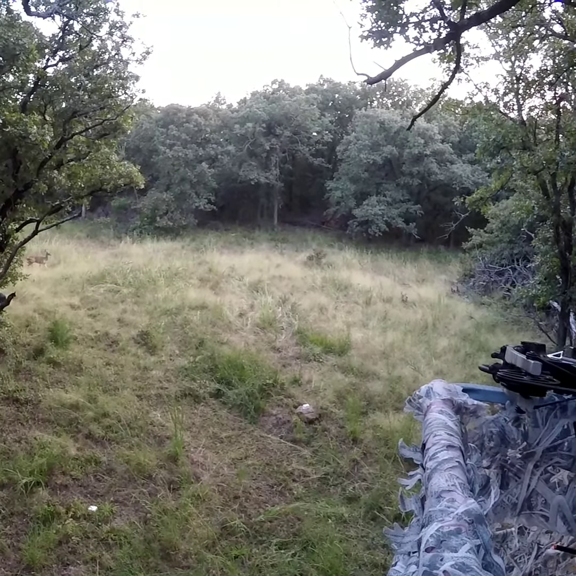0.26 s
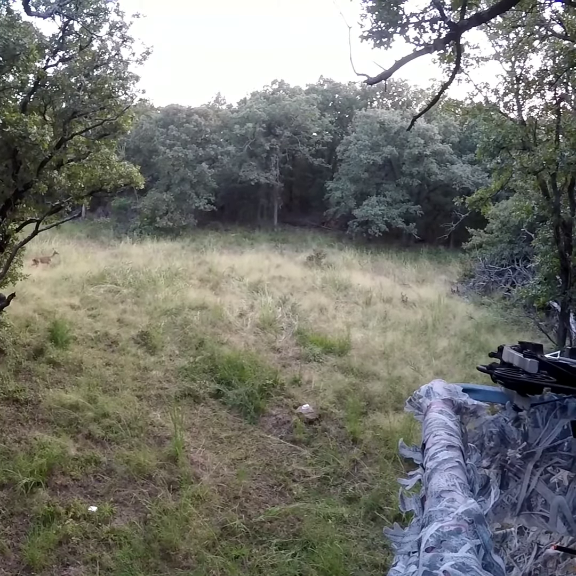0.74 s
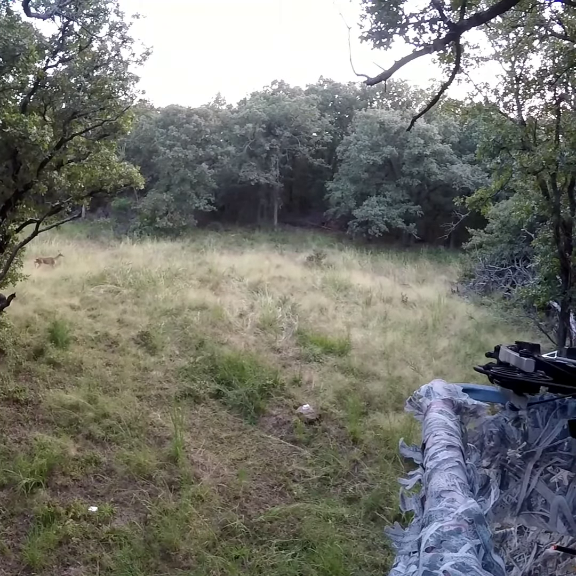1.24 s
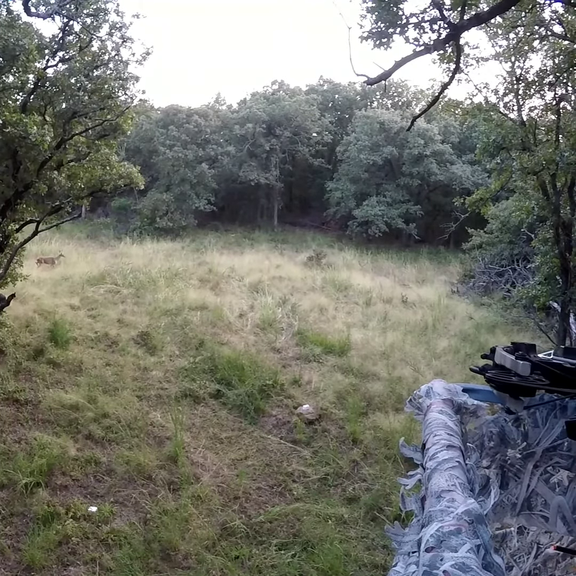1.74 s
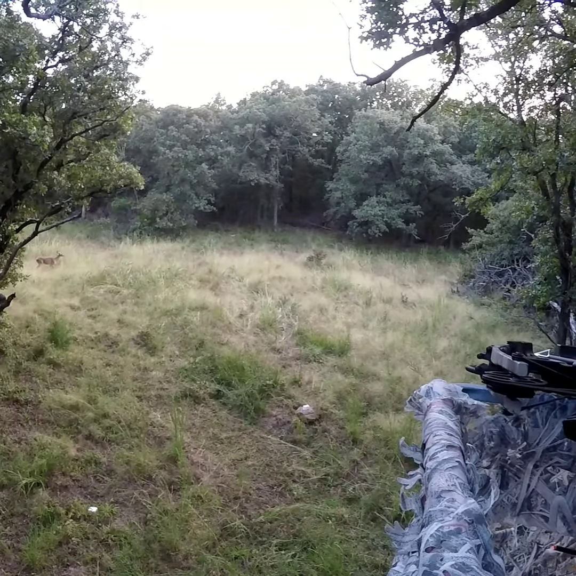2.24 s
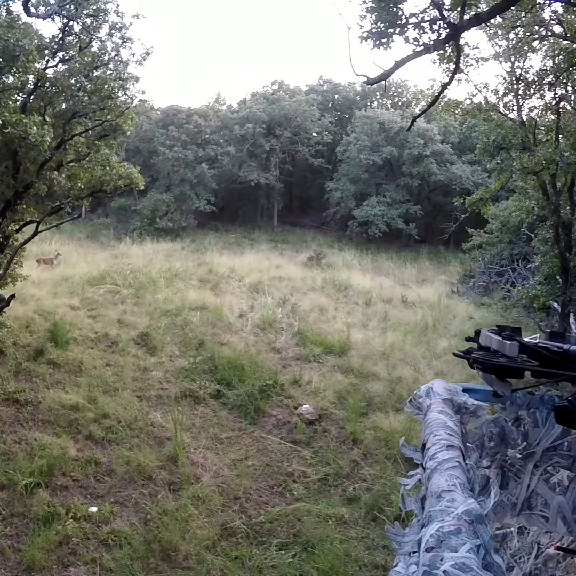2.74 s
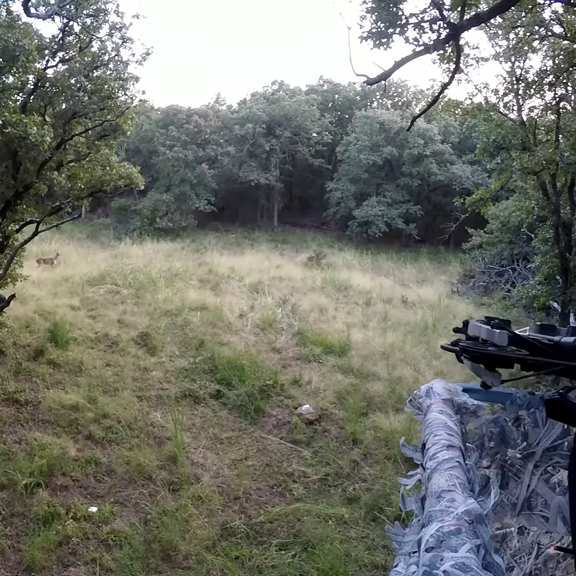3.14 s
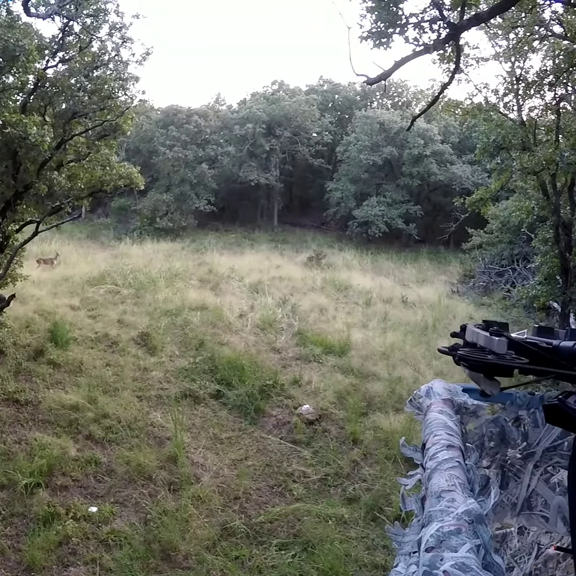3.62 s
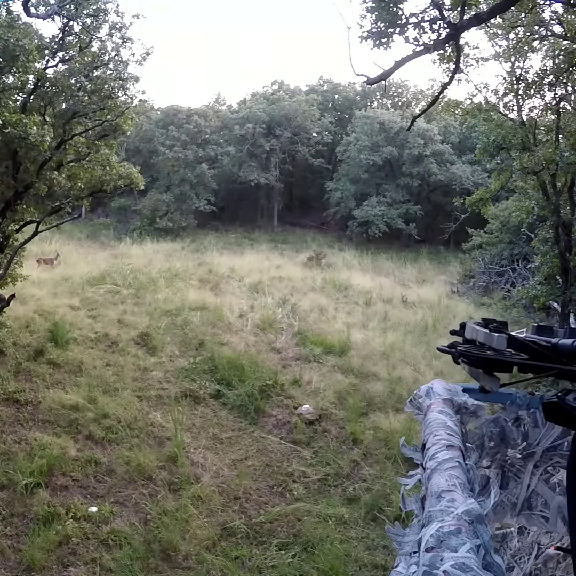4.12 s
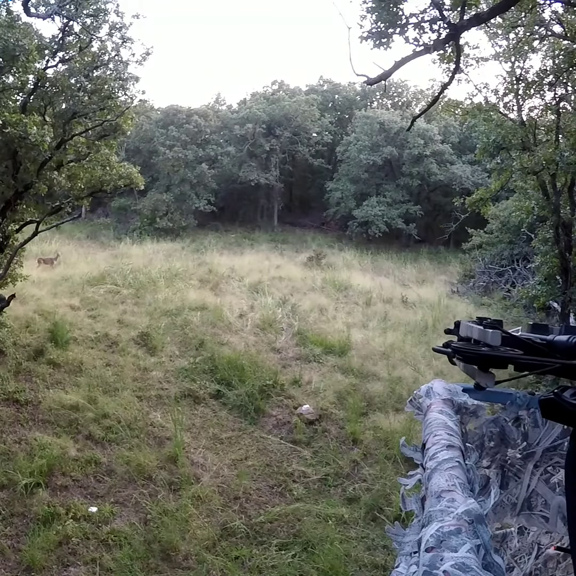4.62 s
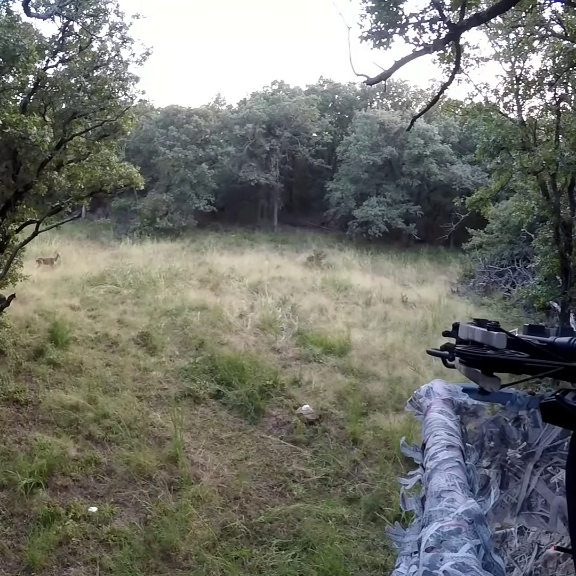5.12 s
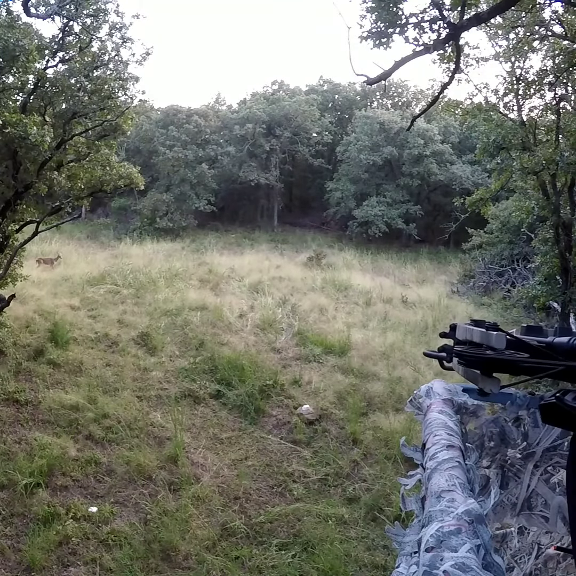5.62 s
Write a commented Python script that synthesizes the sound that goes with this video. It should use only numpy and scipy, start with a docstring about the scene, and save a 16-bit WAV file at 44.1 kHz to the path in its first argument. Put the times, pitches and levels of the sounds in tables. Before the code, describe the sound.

Close, muffled rubbing and low wooden-sounding thumps come through the body of a camera on a stand, uneven for under two seconds, then fading. Behind them, distant crickets give regular two- and three-pulse chirps with slight woodland echo. Very high, dry katydid ticks run through the first two seconds, pause, and return faintly after four. A faint steady air rush and thin hiss fill the open evening meadow.

```python
"""The edge of a meadow in the evening, heard by a camera on a hunting stand. A hand shifts on the stand: stick-slip
friction excites the resonances of frame, mount and shell as a dull rumble with soft knocks, then dies away.
Two crickets chirp in gliding tones with echoes from trunks and wood; a katydid ticks in very high noise bursts.
Shaped noise makes the rush of the air and the fine hiss above it."""
import sys
import numpy as np
from scipy import signal
from scipy.fft import rfft, irfft, next_fast_len
from scipy.io import wavfile
from scipy.ndimage import map_coordinates

SR = 44100
rng = np.random.default_rng(int(sys.argv[2]) if len(sys.argv) > 2 else 0)


def digitize_waveform(pressure):
    """Quantize a signal to 16-bit integers and store it at the path in sys.argv[1].

    Rows of a 2-D input are taken as channels; values are limited to [-1, 1].
    """
    field = np.atleast_2d(pressure).T
    bounded = np.clip(field, -1, 1)
    quanta = np.round(bounded * 32767).astype(np.int16)
    wavfile.write(sys.argv[1], SR, quanta)


N = 258426  # samples


def amp(db):
    """Decibel law: the amplitude gain of a level in dB."""
    return 10 ** (np.asarray(db) / 20)


def along(points, hz):
    """Logarithmic pitch scale: (Hz, value) points joined by straight lines over log frequency."""
    point_hz, value = np.transpose(points)
    return np.interp(np.log(hz + 1), np.log(point_hz + 1), value)


def curves(rows):
    """Linear interpolation: one value per sample for each column after the time."""
    seconds, *columns = np.transpose(rows)
    return [np.interp(np.arange(N) / SR, seconds, column) for column in columns]


def filtered(x, response):
    """Linear filtering: the spectrum of x times a complex response of frequency."""
    size = next_fast_len(x.shape[-1] + 8192)  # padding leaves room for ringing
    spectrum = rfft(x, size) * response(np.fft.rfftfreq(size, 1 / SR))
    return irfft(spectrum, size)[..., :x.shape[-1]]


def band_unit(x, lo_hz, hi_hz):
    """Band level: x scaled to rms 1 inside a band."""
    return x / np.std(filtered(x, lambda hz: (hz > lo_hz) & (hz < hi_hz)))


def modes(table):
    """Modal superposition: the causal response of a few damped resonances, alternating in sign."""
    def response(hz):
        total = 0
        for k, (centre, width, db) in enumerate(table):
            damping = 1j * hz * width
            total = total + (-1) ** k * amp(db) * damping / (centre ** 2 - hz ** 2 + damping)
        return total
    return response


def low_pass(edge_hz):
    """Treble absorption: a smooth roll-off above the edge."""
    return lambda hz: 1 / (1 + (hz / edge_hz) ** 4)


def coloured(spectrum, channels=1):
    """Spectral shaping: white noise given a (Hz, dB) spectrum."""
    return filtered(rng.standard_normal((channels, N)), lambda hz: amp(along(spectrum, hz)))


def wobble(rate):
    """Slow random modulation: a smooth curve through random knots, rate of them a second."""
    knots = rng.standard_normal(int(N * rate / SR) + 4)
    return map_coordinates(knots, [np.arange(N) * rate / SR])


def add(track, s, sound):
    """Superposition: mix a sound into the track, centred on s seconds."""
    start = round(s * SR) - sound.shape[-1] // 2
    track[..., start:start + sound.shape[-1]] += sound


# Drifting levels of the air. Each row: time in seconds, rush in dB, treble hiss in dB.
AIR_LEVELS = [(0.0, -63.5, -66.5), (2.66, -63.5, -66), (3.07, -65, -68), (4.11, -66, -69),
              (4.93, -64.5, -67.5), (5.86, -65.5, -68)]
# Spectrum of the rush. Each row: frequency in Hz, relative density in dB per Hz.
RUSH_SPECTRUM = [(15, -23), (40, -30), (51, -25.5), (62, -34), (114, -33.5), (130, -15), (143, -1),
                 (180, -1), (250, -5.5), (465, -12), (1000, -17.5), (2200, -23), (4000, -27.5), (7000, -48)]
# Spectrum of the hiss. Each row: frequency in Hz, relative density in dB per Hz.
HISS_SPECTRUM = [(2500, -22.5), (4500, -0.5), (5600, -1.5), (7500, -1), (9500, 0.5), (10500, -1),
                 (11800, -7), (14000, -8.5), (15300, -15)]


def air():
    """Broadband noise: a far rush of leaves and distance, with a fine hiss above; each drifts slowly."""
    rush_db, hiss_db = curves(AIR_LEVELS)
    rush = amp(rush_db + 1.05 * wobble(3.22)) * band_unit(coloured(RUSH_SPECTRUM)[0], 1457, 4180)
    hiss = band_unit(coloured(HISS_SPECTRUM, channels=2), 6040, 10630)
    mid, side = amp(hiss_db + .3 * wobble(4.52)) * hiss
    side = amp(-1.0) * side
    return rush + np.array([mid + side, mid - side])


# The hand on the frame. Each row: time in seconds, boom of the frame in dB, scuff of the mount in dB.
HAND_LEVELS = [(0.04, -34, -42.5), (0.11, -34, -45), (0.14, -40, -51.5), (0.25, -41, -53),
               (0.3, -33.5, -43), (0.45, -41, -47.5), (0.52, -51, -63), (0.57, -51.5, -52.5),
               (0.7, -42.5, -51), (0.82, -56, -60.5), (0.94, -44.5, -47), (1.03, -38, -44),
               (1.11, -51, -51.5), (1.19, -41, -53), (1.27, -51, -56), (1.35, -42.5, -46),
               (1.39, -41.5, -50), (1.56, -38.5, -44), (1.62, -46.5, -49.5), (1.76, -57, -54),
               (2.1, -58.5, -65.5)]
# Scrape of the shell under the hand. Each row: time in seconds, level in dB.
SCRAPE_LEVELS = [(0.04, -56), (0.11, -58), (0.14, -67), (0.26, -60.5), (0.45, -63.5), (0.52, -73),
                 (0.95, -66), (1.3, -70), (1.55, -65), (1.75, -75)]
# Sway of the stand. Each row: time in seconds, level in dB.
SWAY_LEVELS = [(0.04, -65), (0.42, -45.5), (0.55, -56), (0.95, -60), (1.02, -53), (1.07, -64.5),
               (1.73, -59.5), (1.83, -78), (2.3, -80)]
# Spectrum of the slow sway. Each row: frequency in Hz, relative density in dB per Hz.
SWAY_SPECTRUM = [(15, -36), (28, -2), (50, 3.5), (85, 4.5), (112, 5), (150, -30), (250, -120)]
# Booming resonances of the frame. Each row: centre in Hz, width in Hz, relative strength in dB.
FRAME_MODES = [(148.2, 24, -5), (169.8, 18.3, -1.5), (192, 26, -5)]
# Resonances of the camera mount. Each row: centre in Hz, width in Hz, relative strength in dB.
MOUNT_MODES = [(296, 17.7, 3), (396.7, 19, -1), (485.6, 60, -5), (566, 45, -2), (675, 62, -9)]
# Resonances of the camera shell. Each row: centre in Hz, width in Hz, relative strength in dB.
SHELL_MODES = [(1053, 240, -3), (1260, 170, 1.5), (1772, 100, 1)]
SETTLE_DB_PER_S = 7.5  # fall of each level after its last row


def settling(rows):
    """Exponential decay: the level curves of a table, falling steadily in dB after its last row."""
    overtime = np.maximum(np.arange(N) / SR - rows[-1][0], 0)
    return curves(rows) - SETTLE_DB_PER_S * overtime


def hand():
    """Stick-slip friction: uneven rubbing force drives frame, mount and shell, while the stand sways."""
    boom_db, scuff_db = settling(HAND_LEVELS)
    scrape_db, sway_db = settling(SCRAPE_LEVELS)[0], settling(SWAY_LEVELS)[0]
    grip_db = 1.83 * np.array([wobble(25.66), wobble(40.04), wobble(40.06)])
    force = rng.standard_normal((3, N)) * amp(grip_db)

    # soft skin passes no treble, hence the low-pass on each part
    boom = filtered(filtered(force[0], modes(FRAME_MODES)), low_pass(edge_hz=320))
    boom = filtered(boom, lambda hz: 1 / (1 + (120 / (hz + 1)) ** 6))  # low cut
    scuff = filtered(filtered(force[1], modes(MOUNT_MODES)), low_pass(edge_hz=930))
    scrape = filtered(filtered(force[2], modes(SHELL_MODES)), low_pass(edge_hz=1800))
    sway = coloured(SWAY_SPECTRUM)[0] * amp(2.1 * wobble(12.7))

    out = amp(boom_db) * band_unit(boom, 130, 240)
    out += amp(scuff_db) * band_unit(scuff, 250, 760)
    out += amp(scrape_db) * band_unit(scrape, 850, 1900)
    return out + amp(sway_db) * band_unit(sway, 50, 120)


# Dull knocks on the frame. Each row: start in seconds, boom in dB before its swell and the low cut,
# rattle in dB rms before its snap and the low cut.
KNOCK_EVENTS = [(0.012, -15.5, -47), (0.096, -26.5, -49), (0.155, -26, -54), (0.188, -23, -50),
                (0.222, -25, -61), (0.274, -28.5, -42.5), (0.404, -33, -48), (0.915, -35, -52),
                (0.954, -38, -44), (1.029, -27, -49), (1.417, -39, -48), (1.469, -35, -36),
                (1.539, -29, -43), (2.326, -37.5, -72), (2.443, -45, -56), (3.429, -43, -57)]


def knocks():
    """Impulse excitation: a soft push sets the frame booming for a few cycles and rattles the mount."""
    out, t = np.zeros(N + SR), np.arange(SR // 10) / SR
    swell = (t / 0.012) ** 2 * np.exp(2 - 2 * t / .011 * (1 + t / 0.066))
    snap = (1 - np.exp(-t / 0.0014)) * np.exp(-t / 0.02)  # the mount answers at once
    for s, boom_db, rattle_db in KNOCK_EVENTS:
        boom_hz = 172 * (1 + 0.0077 * rng.standard_normal())
        boom = np.sin(2 * np.pi * boom_hz * t)
        rattle = filtered(rng.standard_normal(len(t)), modes(MOUNT_MODES))
        rattle = filtered(rattle, low_pass(edge_hz=850))
        knock = swell * amp(boom_db) * boom + snap * amp(rattle_db) * rattle / rattle.std()
        start = round(s * SR)
        out[start:start + len(t)] += knock
    return filtered(out[:N], lambda hz: 1 / (1 + (115 / (hz + 1)) ** 8))  # a quick push moves nothing deep


# Katydid rasps. Each row: middle in seconds, level in dB before panning and the common cut of 4.5 dB.
KATYDID_RASPS = [(0.0643, -65), (0.1844, -61), (0.3152, -64), (0.4254, -62), (0.5394, -63), (0.6404, -63),
                 (0.7324, -62), (0.8255, -62), (0.9413, -62), (1.0685, -59), (1.1724, -59), (1.2744, -61),
                 (1.3874, -63), (1.5104, -65), (1.6344, -65), (1.7764, -65), (1.8784, -65), (2.0014, -64),
                 (2.1154, -63), (2.2444, -64), (4.2477, -66), (4.3445, -66), (4.5301, -63), (4.6174, -65),
                 (4.7027, -64), (4.7884, -63)]
# Spectrum of a rasp. Each row: frequency in Hz, relative density in dB per Hz.
RASP_SPECTRUM = [(10500, -120), (11800, -25), (12600, -3), (13500, 0), (15000, -6), (16000, -14)]
LEFT_DB, DRIFT_DB_PER_S = 5, -1.5  # left over right: the rasps start on the left and drift to the right


def katydid():
    """Incoherent noise bursts: very high scraping, with independent noise in the two channels."""
    gate, u = np.zeros((2, N)), np.linspace(-3, 3, int(.042 * SR))
    bell = np.exp(-u ** 2 / 2)
    for s, db in KATYDID_RASPS:
        pan_db = LEFT_DB + DRIFT_DB_PER_S * s
        add(gate, s, amp(db + np.array([[pan_db / 2], [-pan_db / 2]])) * bell)
    rasp = coloured(RASP_SPECTRUM, channels=2)
    return gate * rasp / rasp.std() * amp(-4.5)  # rms of a noise lies under its peak


def strokes(table, top_hz, sag_hz, length, rough, warm_up):
    """Stridulation, file on scraper: each tone climbs to a sharp top and slides down as the wing slows."""
    out, u = np.zeros(N + SR, complex), np.linspace(-1, 1, int(length * SR))  # length in seconds
    # uneven teeth shake level (dB) and phase (radians)
    flutter = amp(rough * wobble(160)) * np.exp(.35j * rough * wobble(120))
    shape = np.sqrt(1 - u ** 2) * amp(-4 * np.abs(u) + .8 * u)
    # a gap over .15 s marks the first stroke of a chirp: it slides down less, and warm_up lowers it
    opening = np.diff(np.array(table)[:, 0], prepend=-1) > .15
    for (s, db), first in zip(table, opening):
        peak_hz = top_hz * (1 + 0.0066 * rng.standard_normal() - warm_up * first)
        slide_hz = sag_hz * (1 - .45 * first * (u > 0)) * np.abs(u + 0.151) ** 1.59
        phase = 2 * np.pi * np.cumsum(peak_hz - slide_hz) / SR
        add(out, s, amp(db) * shape * np.exp(1j * phase))
    return (out[:N] * flutter).real


# Chirps of the near cricket. Each row: middle stroke in seconds, its level in dB before flutter and echoes,
# opening stroke in dB over it, closing stroke in dB over it.
NEAR_CHIRPS = [(0.222, -63.5, -.4, .4), (0.696, -61.5, -8, .4), (1.151, -62, -2, 2.5), (1.573, -60, -8, -1),
               (2.06, -60, -5, -.4), (2.515, -59.5, -4, -3), (3.103, -62, -6, 1), (3.571, -63.5, -6, -1.5),
               (4.168, -63, -6, -1.5), (4.772, -63, -7, 0), (5.208, -64.5, -2, .4), (5.723, -64.5, -6, 3)]
OPENING_S, CLOSING_S = .06, .08  # first stroke before the middle one, last after it
# Chirps of the lower cricket. Each row: first stroke in seconds, its level in dB before flutter and echoes.
LOWER_CHIRPS = [(0.4663, -68), (0.9174, -70), (1.3369, -71), (1.8522, -66), (2.417, -64), (3.655, -71),
                (4.165, -66.5), (4.785, -65), (5.25, -72)]
SECOND_S, SECOND_DB = .073, 0.5  # its second stroke: delay and level over the first
# Trunks near the singers. Each row: delay in seconds, echo in dB.
TRUNK_ECHOES = [(.031, -10), (.052, -13), (.085, -18.5)]


def crickets():
    """Echo and reverberation: chirps of three and two strokes, repeated by trunks and smeared by the wood."""
    near, lower = [], []
    for s, db, opening_db, closing_db in NEAR_CHIRPS:
        near += [(s - OPENING_S, db + opening_db), (s, db), (s + CLOSING_S, db + closing_db)]
    for s, db in LOWER_CHIRPS:
        lower += [(s, db), (s + SECOND_S, db + SECOND_DB)]
    direct = strokes(near, 5140, 640, length=.04, rough=2, warm_up=.035)
    direct += strokes(lower, 4720, 120, length=.024, rough=2.5, warm_up=0)

    t = np.arange(SR // 4) / SR
    decay = amp(-60 * t / 0.29)  # 60 dB in 0.29 s
    tail = rng.standard_normal(len(t)) * decay * (1 - np.exp(-(t / .03) ** 2))  # the wood answers late
    tail *= amp(-7) / np.linalg.norm(tail)
    for delay, db in TRUNK_ECHOES:
        tail[round(delay * SR)] += amp(db)
    return direct + signal.fftconvolve(direct, tail)[:N]


def scene():
    """Superposition: all five sounds summed; hand, knocks and crickets are the same in both channels."""
    return air() + hand() + knocks() + katydid() + crickets()


# Strength of the left-right difference. Each row: frequency in Hz, gain in dB.
SIDE_GAIN = [(11700, -9), (12300, -0.5), (13200, -1), (15300, 4)]
APART_HZ, TOP_HZ = 11700, 15330  # the channels differ only above the first; nothing is kept above the second


def record(dry):
    """Mid-side stereo and band limiting: left and right differ only in the top treble."""
    mid = (dry[0] + dry[1]) / 2
    side = (dry[0] - dry[1]) / 2
    side = filtered(side, lambda hz: amp(along(SIDE_GAIN, hz)) * (hz > APART_HZ))
    return filtered(np.array([mid + side, mid - side]), lambda hz: hz < TOP_HZ)


dry = scene()
out = record(dry)
digitize_waveform(out)
```